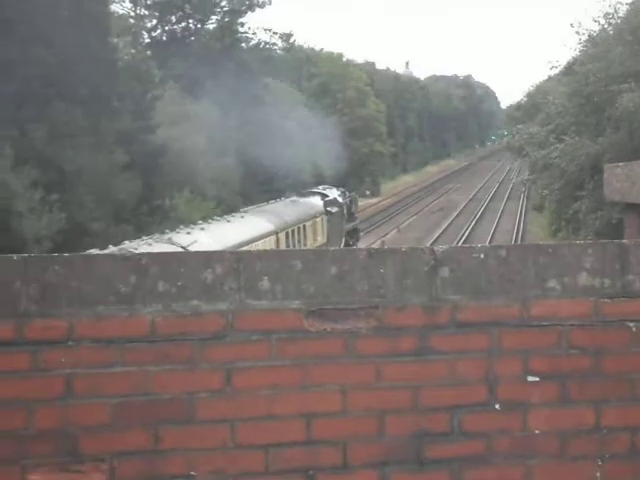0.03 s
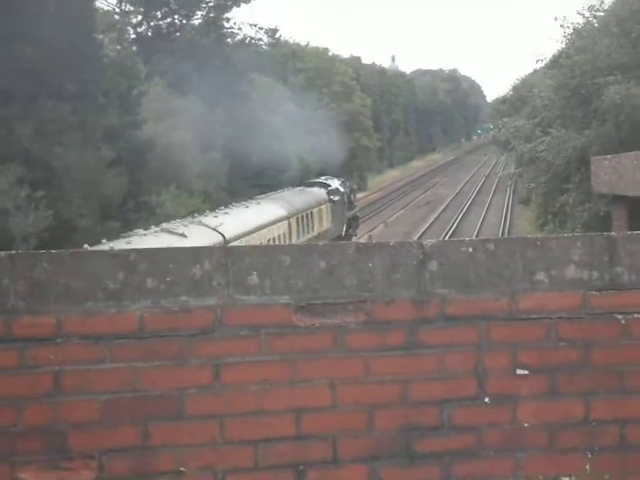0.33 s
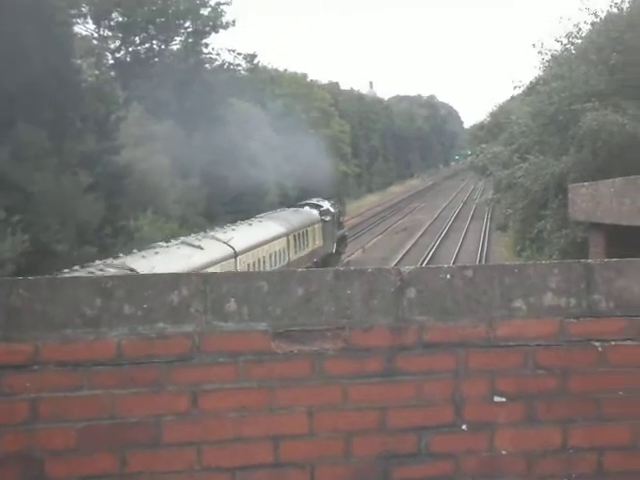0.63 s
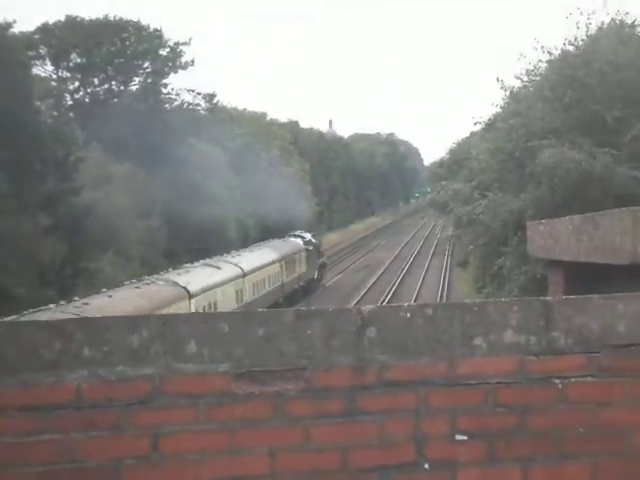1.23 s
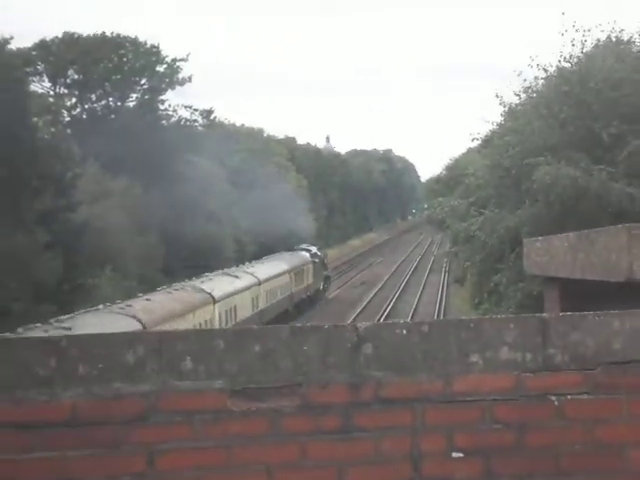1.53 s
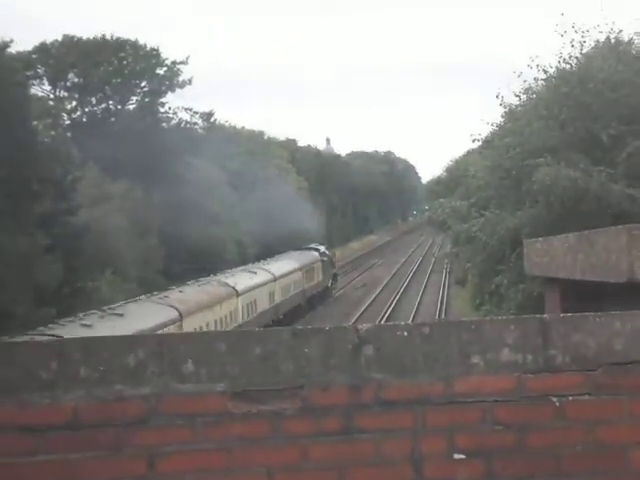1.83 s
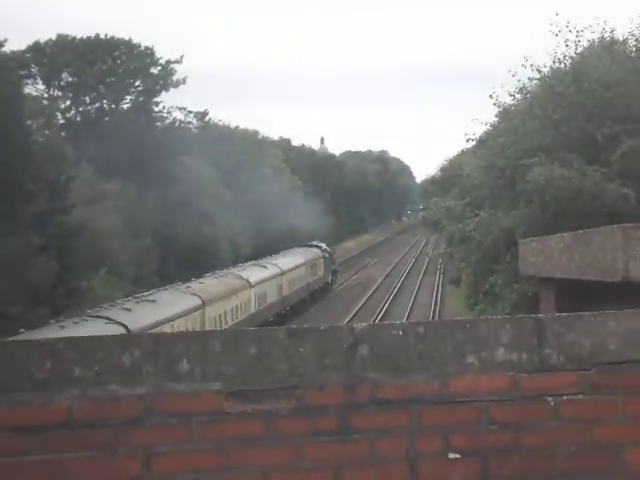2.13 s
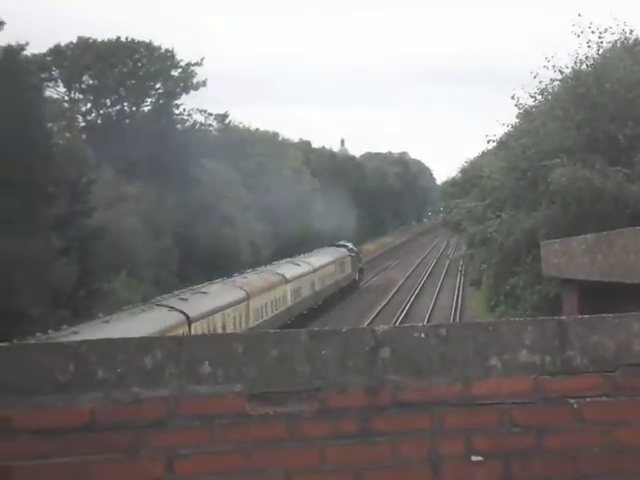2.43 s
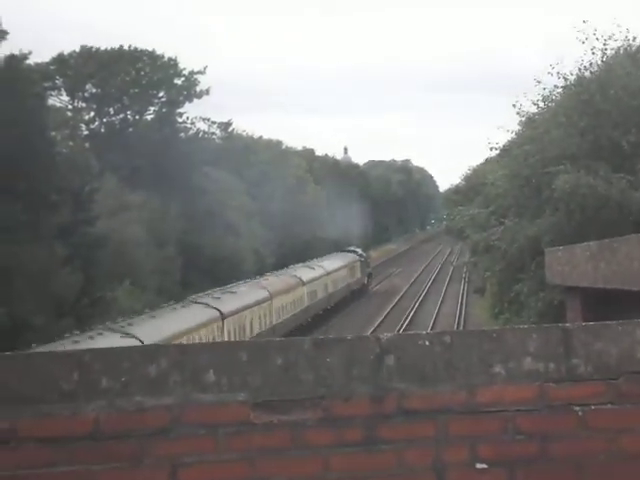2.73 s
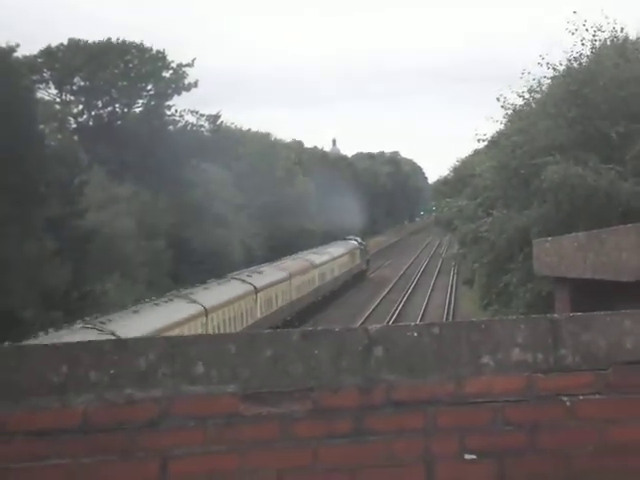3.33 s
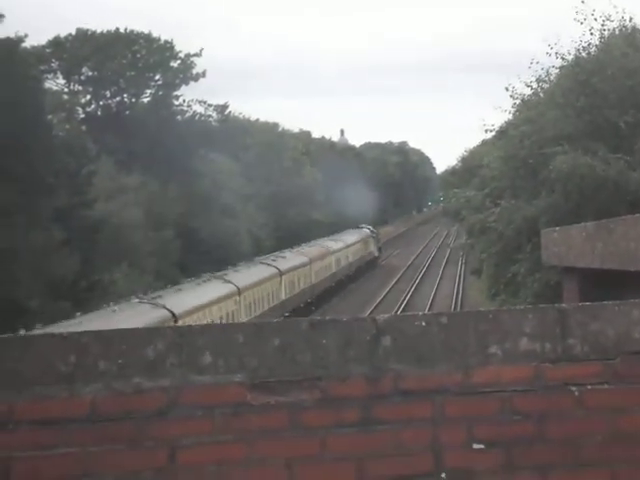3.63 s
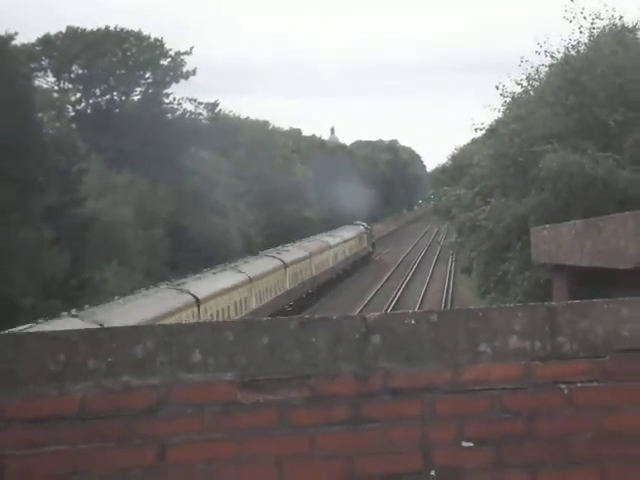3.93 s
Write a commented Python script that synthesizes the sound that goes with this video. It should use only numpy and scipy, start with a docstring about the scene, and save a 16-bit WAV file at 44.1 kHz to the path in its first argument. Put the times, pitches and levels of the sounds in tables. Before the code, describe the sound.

Steady roar of a departing steam train, with drumming coaches, dull knocks and fading puffs.

```python
"""Rough wheels roar on the rails as a steam train draws away along a wooded cutting,
heard from a bridge behind its last coaches. Coach panels drum, one coach booms in passing,
and the running gear knocks and rattles. The engine's quick puffs of steam fade into the roar.
Behind it all lie the rumble of the track bed, thin wheel tones and a faint hiss."""
import sys
import numpy as np
from scipy import signal
from scipy.fft import rfft, irfft
from scipy.io import wavfile
from scipy.ndimage import uniform_filter1d

SR = 44100
rng = np.random.default_rng(int(sys.argv[2]) if len(sys.argv) > 2 else 0)


def digitize_waveform(pressure):
    """Quantize a signal to 16-bit integers and store it at the path in sys.argv[1].

    Rows of a 2-D input are taken as channels; values are limited to [-1, 1].
    """
    field = np.atleast_2d(pressure).T
    bounded = np.clip(field, -1, 1)
    quanta = np.round(bounded * 32767).astype(np.int16)
    wavfile.write(sys.argv[1], SR, quanta)


N = 176400
T = np.arange(N) / SR
HZ = np.fft.rfftfreq(N, 1 / SR)


def amp(db):
    """Decibels to gain."""
    return 10 ** (np.asarray(db) / 20)


def unit(x):
    """Scales to rms 1."""
    return x / np.sqrt(np.mean(x ** 2) + 1e-20)


def curve(points, t):
    """Reads a control curve at times t."""
    return np.interp(t, *np.transpose(points))


def shaped(x, spectrum):
    """Filters x by a spectrum interpolated in log frequency; rms 1."""
    hz, db = np.transpose(spectrum)
    gain = amp(np.interp(np.log(HZ + 1), np.log(hz), db))
    return unit(irfft(rfft(x) * gain, N))


def noise(spectrum):
    """Steady coloured noise; rms 1."""
    return shaped(rng.standard_normal(N), spectrum)


def ring(hz, width_hz):
    """A resonance kept ringing by random contact; rms 1."""
    response = 1 / (1 + ((HZ - hz) / width_hz) ** 2)
    return unit(irfft(rfft(rng.standard_normal(N)) * response, N))


def rush(spectrum, patchy_db, flutter_db, extra_db=lambda hz, t: 0):
    """Noise with drifting patches and a flutter shared by all pitches; rms 1."""
    hz, t, bins = signal.stft(rng.standard_normal(N), SR, nperseg=1024, noverlap=768)
    patches = uniform_filter1d(rng.standard_normal(bins.shape), size=9, axis=0)
    patches = unit(uniform_filter1d(patches, size=14, axis=1))
    flutter = unit(uniform_filter1d(rng.standard_normal(len(t)), size=5))
    bins *= amp(patchy_db * patches + flutter_db * flutter + extra_db(hz[:, None], t))
    _, uneven = signal.istft(bins, SR, nperseg=1024, noverlap=768)
    return shaped(uneven[:N], spectrum)


def bursts(events, rise_s, hold_s, decay_s):
    """Summed rise, hold and decay envelopes of a table of events."""
    envelope = np.zeros(N)
    for start_s, db in events:
        age_s = T - start_s
        attack = np.clip(age_s / rise_s, 0, 1)
        release = np.exp(-np.maximum(age_s - rise_s - hold_s, 0) / decay_s)
        envelope += amp(db) * attack * release
    return envelope


def band(hz, centre_hz, width_oct):
    """Bell curve in log frequency; peak 1."""
    return np.exp(-.5 * (np.log2((hz + 1) / centre_hz) / width_oct) ** 2)


# Roar spectrum (frequency [Hz], relative level [dB])
ROAR_SPECTRUM = [(100, -28), (250, -15), (378, -9), (430, -0.6), (530, 1), (660, -2.5), (870, -1),
                 (1000, -1.5), (1110, -6), (1250, -6), (1305, -3), (1440, -7.5), (1505, -7.5),
                 (1580, -17.5), (1700, -13.5), (1890, -11), (2010, -12.5), (2100, -16), (2700, -20),
                 (3300, -29.5), (4500, -39), (7000, -54), (12000, -70.5)]
# Roar envelope (time [s], level [dB])
ROAR_DB = [(0, -21.5), (.4, -19.8), (.75, -20), (1.3, -19.5), (1.9, -20.5), (2.3, -20), (3.05, -20),
           (3.3, -21), (3.7, -20), (4, -21.5)]
# Wheel ring against the roar (time [s], gain [dB])
WHEEL_RING_DB = [(0, 0.5), (.9, -1.8), (1.6, 1), (2.3, .5), (3, -0.4), (4, -1.3)]
# Rail ring against the roar (time [s], gain [dB])
RAIL_RING_DB = [(0, 0.7), (.45, 1.2), (.72, -0.3), (1.3, -2), (1.8, -0.2), (2.25, 2.2), (2.47, -0.5),
                (2.95, 1.5), (3.3, 0.5), (4, -0.5)]


def rolling_roar():
    """Rough wheels on rails: a broad roar in which the rings of wheel and rail swell in turn."""
    def rings_db(hz, t):
        wheel_db = curve(WHEEL_RING_DB, t) * band(hz, centre_hz=2100, width_oct=.45)
        rail_db = curve(RAIL_RING_DB, t) * band(hz, centre_hz=880, width_oct=.21)
        return wheel_db + rail_db
    roar = rush(ROAR_SPECTRUM, patchy_db=.53, flutter_db=.05, extra_db=rings_db)
    return amp(curve(ROAR_DB, T)) * roar


# Coach body spectrum (frequency [Hz], relative level [dB])
DRUM_SPECTRUM = [(40, -23), (90, -3.5), (140, -6.5), (168, 0), (195, -1), (225, 0), (300, -2.5),
                 (360, -3.5), (600, -29), (1500, -62)]
# Drumming envelope (time [s], level [dB])
DRUMMING_DB = [(0, -34), (.2, -32), (.5, -37), (1, -35.5), (1.5, -36), (1.85, -36.5), (2.3, -33),
               (2.75, -30), (3.1, -36.5), (3.7, -37.5), (4, -40.5)]


def coach_drumming():
    """Coach bodies drum over one constantly stirred panel resonance."""
    bodies = amp(curve(DRUMMING_DB, T)) * noise(DRUM_SPECTRUM)
    panel = amp(-41.5) * ring(hz=184.2, width_hz=22)
    return bodies + panel


def coach_boom(centre_hz=197, rise_hz_per_s=70, waver_hz=4.93, peak_s=2.45, span_s=.1):
    """One coach booms in passing: a low hum that swells and fades as its pitch rises."""
    waver = unit(uniform_filter1d(rng.standard_normal(N), size=2000))
    pitch_hz = centre_hz + rise_hz_per_s * (T - peak_s) + waver_hz * waver
    hum = unit(np.sin(2 * np.pi * np.cumsum(pitch_hz) / SR))
    swell = np.exp(-((T - peak_s) / span_s) ** 2)
    return amp(-31) * swell * hum


# Knocks (time [s], relative level [dB])
KNOCK_EVENTS = [(.34, 1.5), (.61, 0), (1.02, -9), (1.53, -7.5), (2.26, 2.5), (2.37, -15), (2.7, -1),
                (3.49, 2.5)]
# Knock spectrum (frequency [Hz], relative level [dB])
KNOCK_SPECTRUM = [(30, -4), (300, -11.5), (450, 4.5), (800, 4.5), (1300, -9.5), (1700, -6), (3000, -28),
                  (8000, -60)]


def gear_knocks():
    """Dull knocks of wheels and couplings, smeared by the cutting."""
    envelope = bursts(KNOCK_EVENTS, rise_s=.008, hold_s=.012, decay_s=.03)
    return amp(-24.5) * envelope * noise(KNOCK_SPECTRUM)


# Rattle spectrum (frequency [Hz], relative level [dB])
RATTLE_SPECTRUM = [(300, -16), (900, 8), (1400, 2), (1620, -1), (1950, -2.5), (2700, -5), (4000, -16),
                   (7000, -35), (12000, -61)]


def gear_rattle(hits_per_s=70, spread_db=3, decay_s=.006):
    """Running gear rattles: small random hits, each a quickly dying burst of noise."""
    hits = rng.random(N) < hits_per_s / SR
    strength = amp(spread_db * np.minimum(rng.exponential(1, N), 3))
    envelope = signal.lfilter([1], [1, -np.exp(-1 / (decay_s * SR))], hits * strength)
    return amp(-40.5) * shaped(envelope * rng.standard_normal(N), RATTLE_SPECTRUM)


# Puffs (time [s], relative level [dB])
PUFF_EVENTS = [(0, -1.5), (.095, -1), (.165, 1), (.205, -6), (.31, -2.5), (.385, -0.5), (.525, -8),
               (.59, -3), (.795, -1), (.94, -1.5), (1.0, -3.5), (1.205, -2), (1.355, -4), (1.435, -1.5),
               (1.63, -2), (1.83, -5), (1.93, -7), (2.48, -7)]
# Puff spectrum (frequency [Hz], relative level [dB])
PUFF_SPECTRUM = [(150, -7), (500, 1.5), (1000, 2.5), (1700, -2.5), (2700, -8), (4200, -13), (5500, -17),
                 (7500, -31), (10000, -39.5), (11000, -54), (12500, -69)]


def steam_puffs():
    """The engine exhausts steam in short puffs that thin out as it recedes."""
    envelope = bursts(PUFF_EVENTS, rise_s=.012, hold_s=.01, decay_s=.025)
    return amp(-29) * envelope * noise(PUFF_SPECTRUM)


# Track bed spectrum (frequency [Hz], relative level [dB])
TRACK_SPECTRUM = [(8, -21), (22, -6.5), (40, 4), (55, -3), (80, -5), (120, -12), (250, -22), (800, -70.5)]
# Rumble envelope (time [s], level [dB])
TRACK_DB = [(0, -35), (.7, -37), (1.3, -38), (1.85, -36.5), (2.1, -33.5), (2.45, -39.5), (2.85, -36.5),
            (3.2, -39.5), (4, -38.5)]


def track_rumble():
    """The track bed rumbles under the train."""
    return amp(curve(TRACK_DB, T)) * noise(TRACK_SPECTRUM)


# Wheel resonances (frequency [Hz], width [Hz], starting level [dB])
WHEEL_RESONANCES = [(1906, 70, -44), (4060, 50, -63), (5640, 78, -58.5)]


def wheel_tones():
    """Rolling contact keeps the wheels ringing thinly."""
    return sum(amp(db) * ring(hz, width_hz) for hz, width_hz, db in WHEEL_RESONANCES)


# Hiss spectrum (frequency [Hz], relative level [dB])
HISS_SPECTRUM = [(1000, -12), (2500, -1.5), (3100, 1.5), (3450, 1.5), (3700, 2), (4050, -.5), (4400, -3),
                 (5300, -4), (5800, -6), (6300, -10), (7000, -14.5), (7600, -18.5), (9900, -20.5),
                 (10400, -25), (11000, -42), (11600, -42), (12200, -49)]


def hiss():
    """Smooth treble of steel and steam."""
    return amp(-42) * rush(HISS_SPECTRUM, patchy_db=.7, flutter_db=.17)


def scene():
    """The whole train in mono; wheel tones and hiss fade slowly as it recedes."""
    fade_db_per_s = .24
    train = rolling_roar() + coach_drumming() + coach_boom()
    train += gear_knocks() + gear_rattle() + steam_puffs() + track_rumble()
    treble = amp(-fade_db_per_s * T) * (wheel_tones() + hiss())
    return (train + treble)[None]


def record(dry):
    """Steep low-pass on the whole scene."""
    cutoff_hz = 11700
    lowpass = signal.firwin(511, cutoff_hz, window=("kaiser", 9), fs=SR)
    return signal.oaconvolve(dry, lowpass[None], "same")


dry = scene()
out = record(dry)
digitize_waveform(out)
```